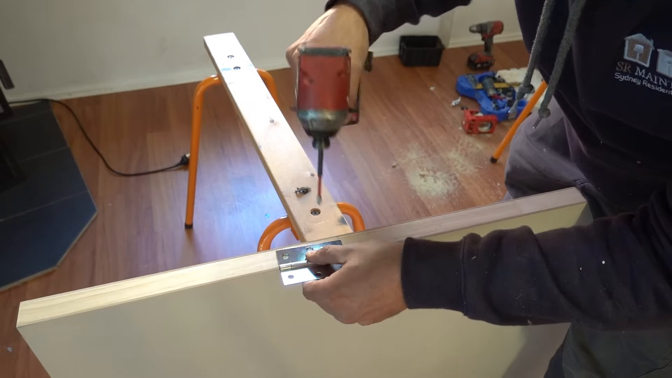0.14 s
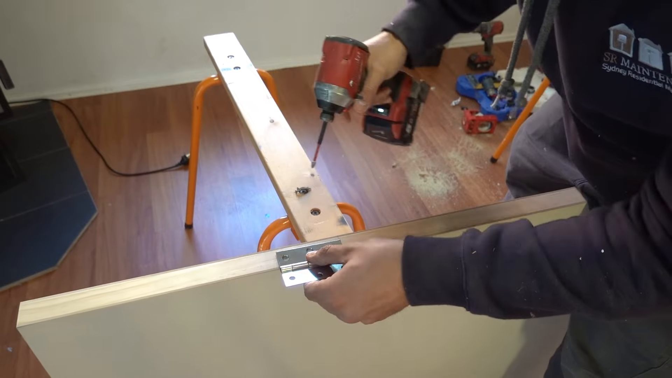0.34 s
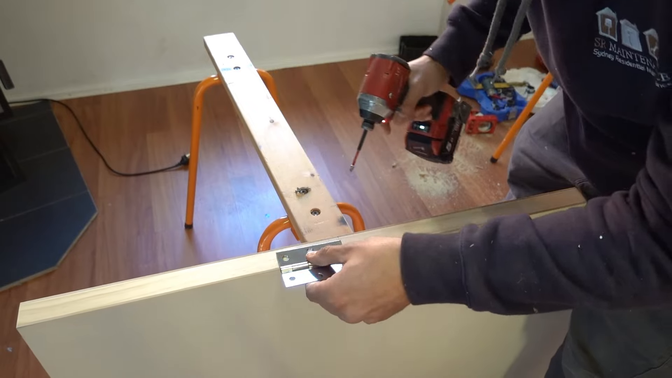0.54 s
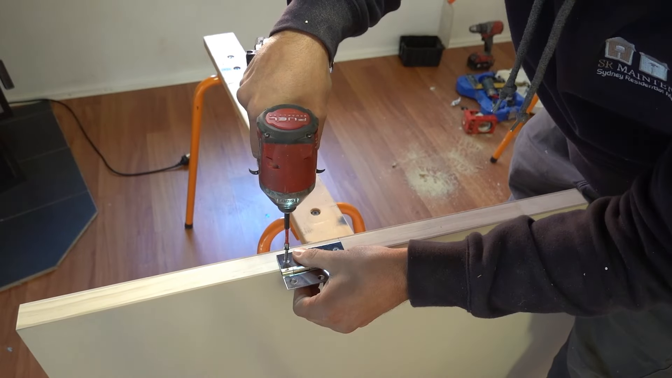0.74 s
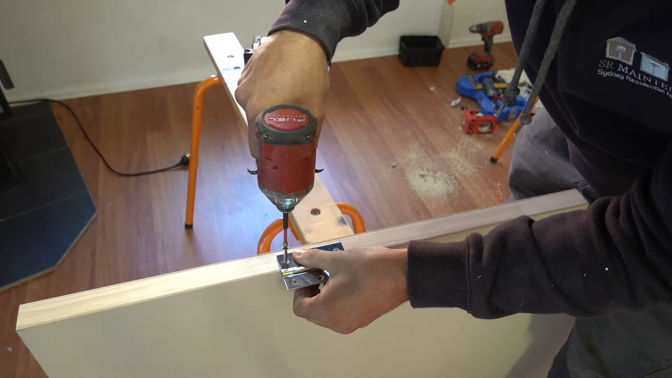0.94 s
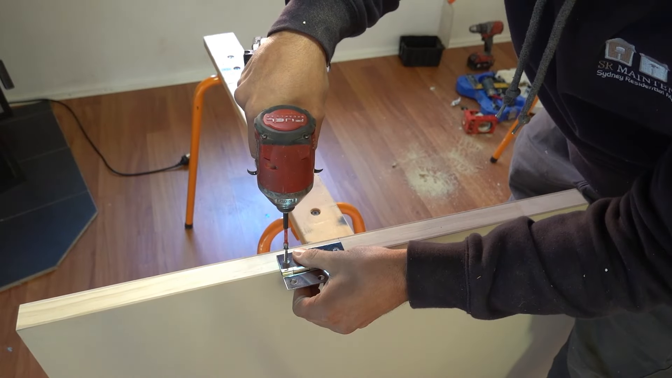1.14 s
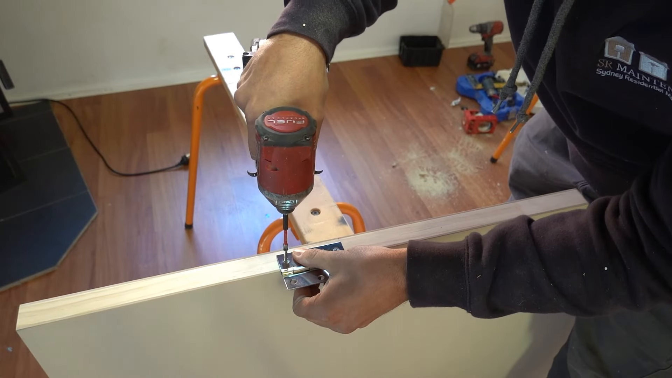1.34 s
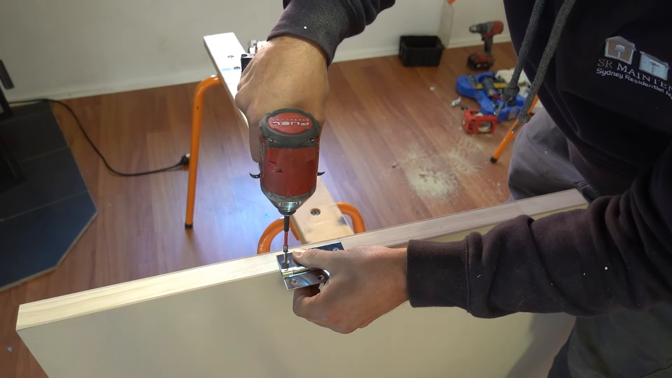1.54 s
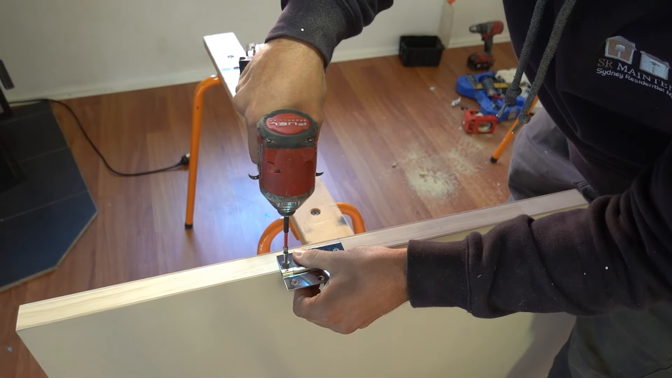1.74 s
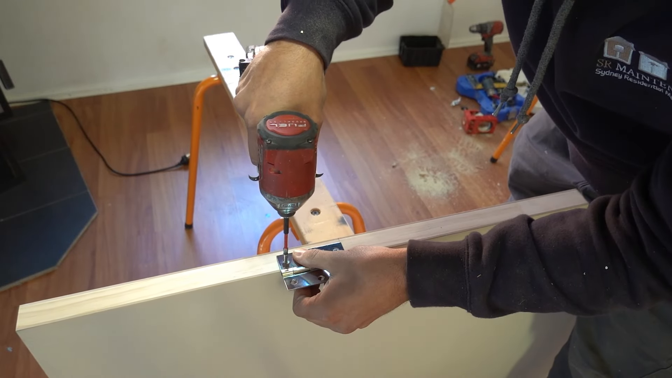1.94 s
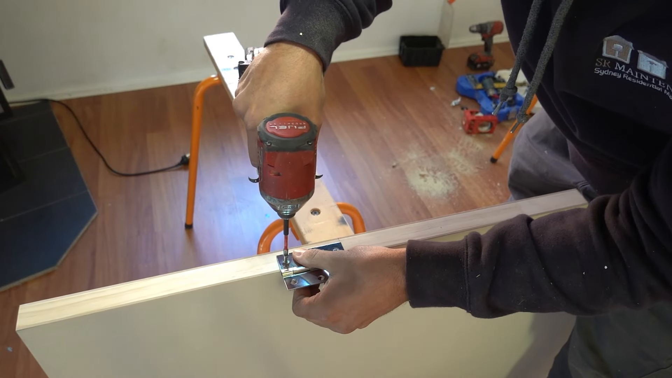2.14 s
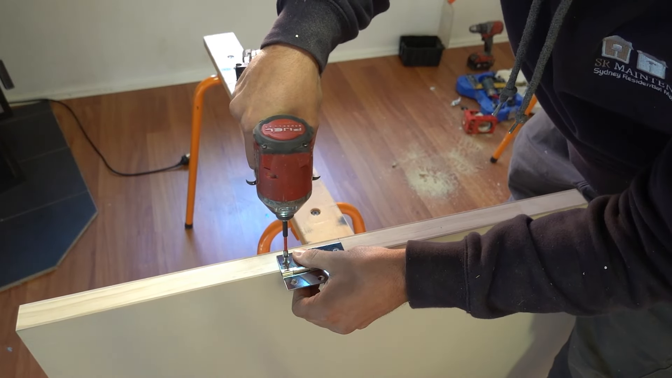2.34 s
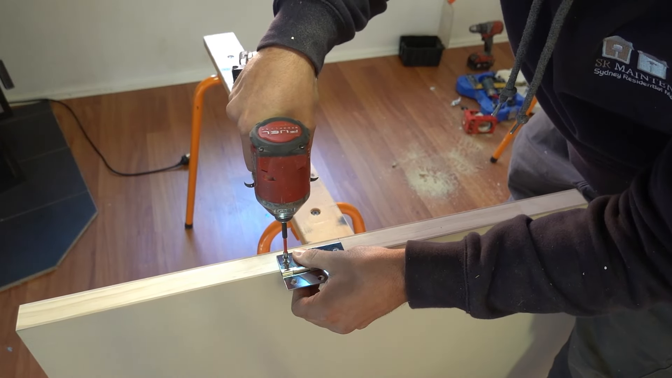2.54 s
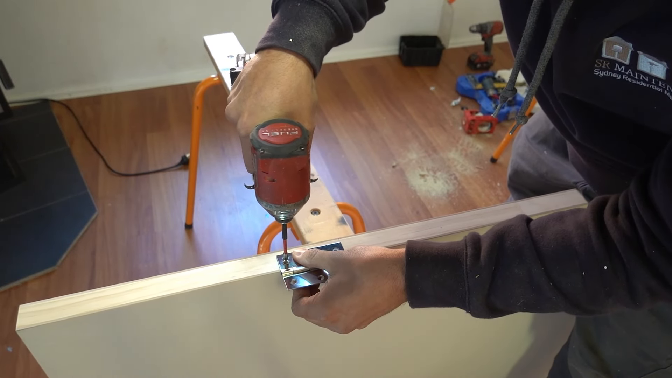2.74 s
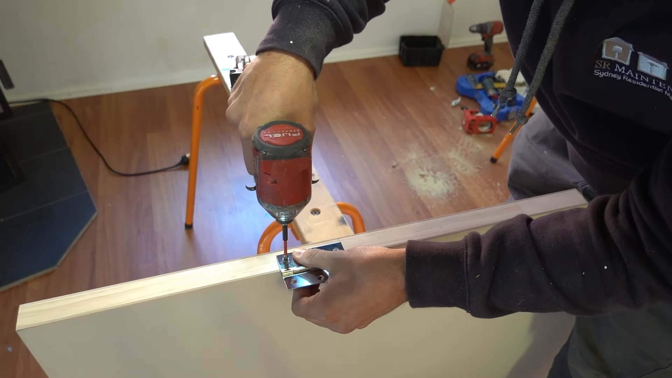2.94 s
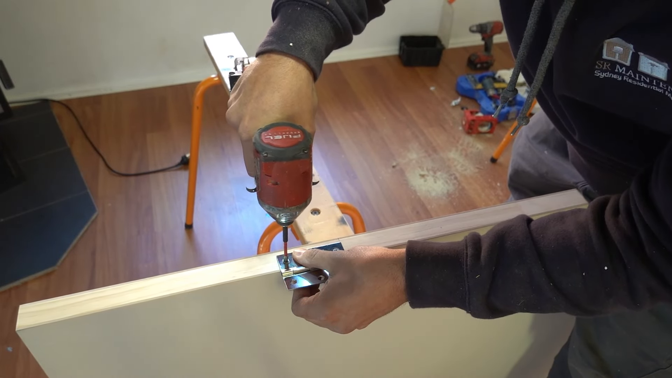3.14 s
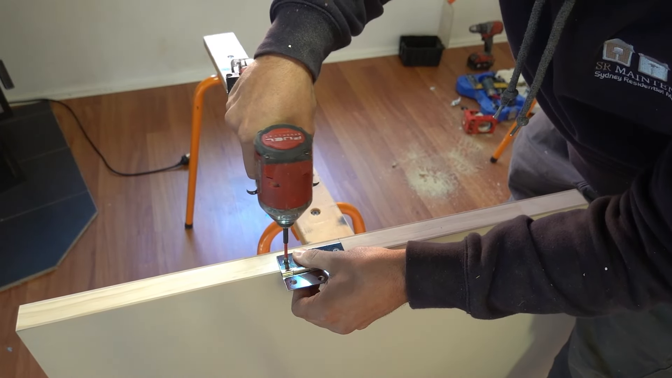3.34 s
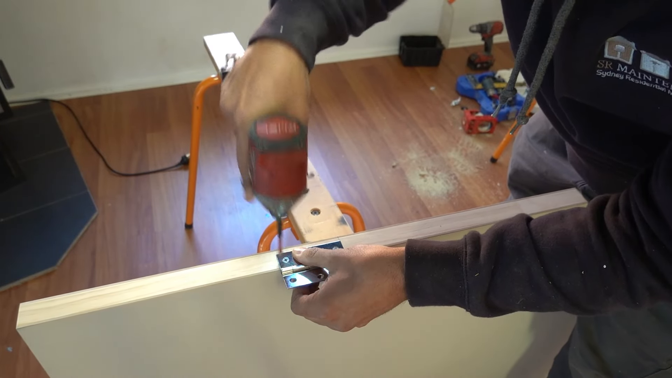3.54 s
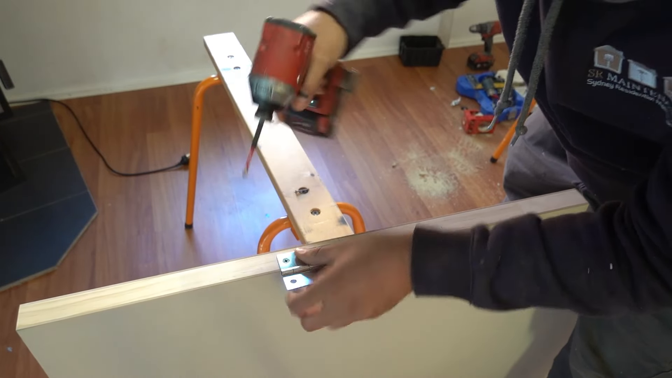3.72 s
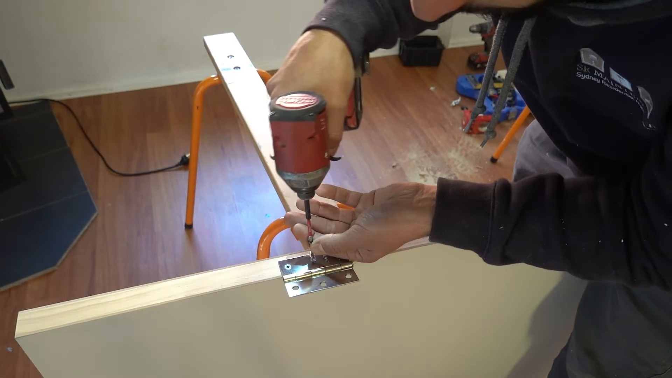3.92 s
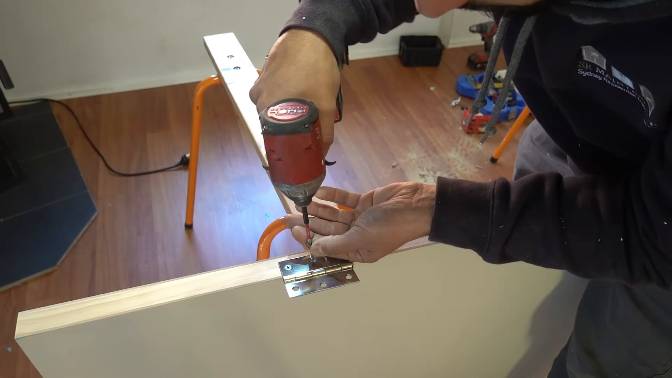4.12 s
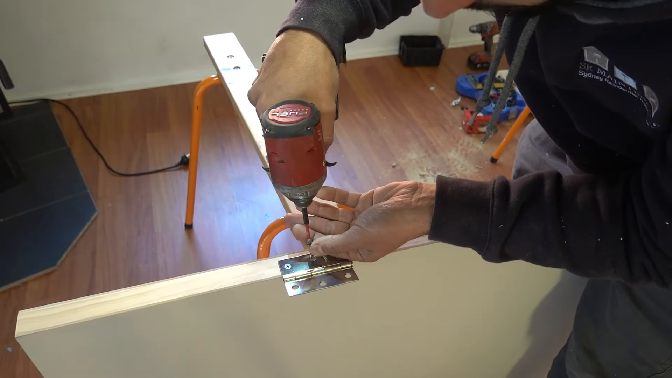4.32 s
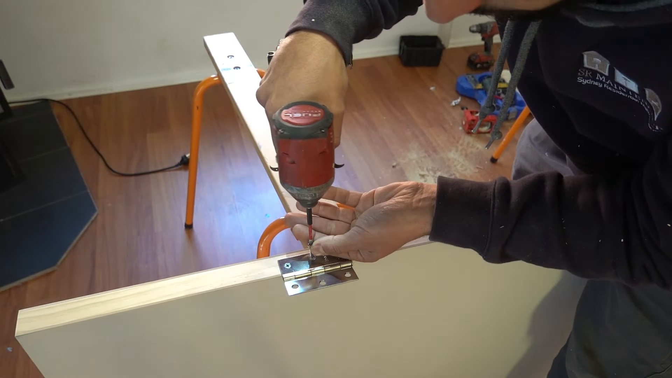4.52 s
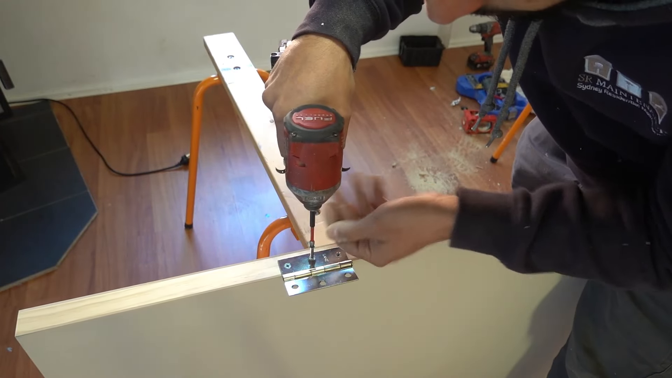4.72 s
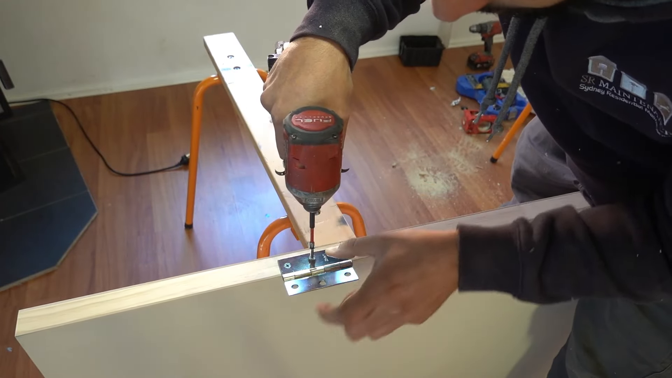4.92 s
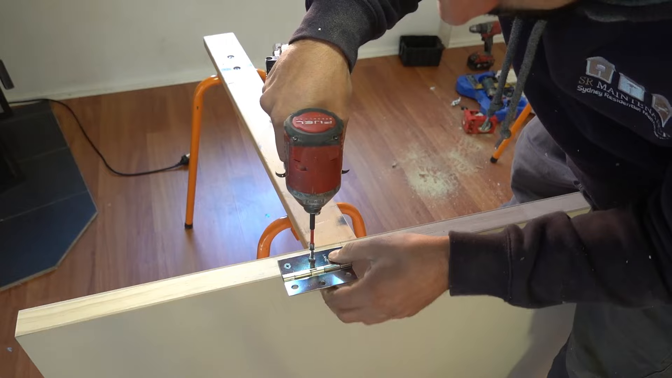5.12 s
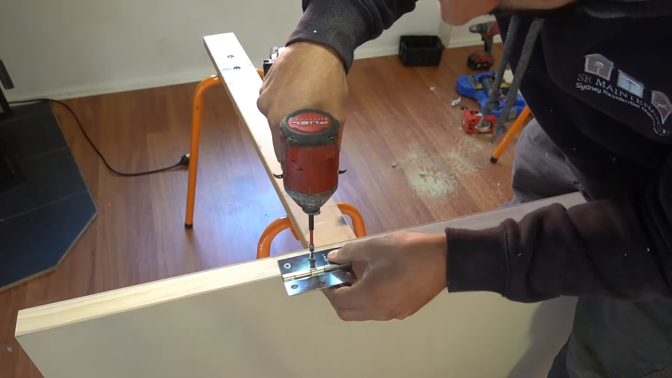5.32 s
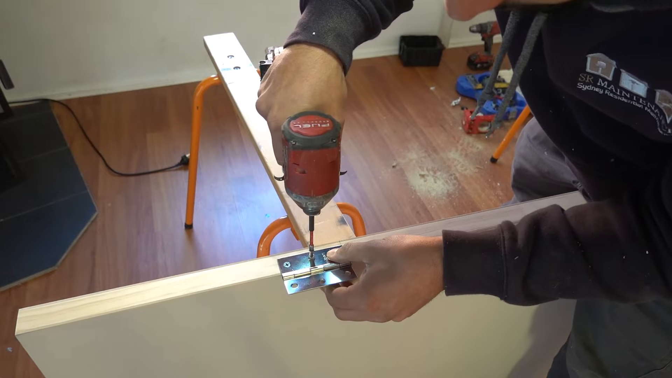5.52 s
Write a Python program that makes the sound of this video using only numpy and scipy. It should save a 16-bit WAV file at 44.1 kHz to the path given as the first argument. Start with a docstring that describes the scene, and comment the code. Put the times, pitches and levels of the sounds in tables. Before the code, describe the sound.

A cordless impact driver winds down with a thump and a few clicks. It creeps back to life, then whirs steadily for nearly three seconds, with rattling gears and a thin high whine, as it drives a screw into a door hinge. It stops with sharp clicks and a thud from the door. The bit taps a screw and a faster run follows. The sound is close, in a bare, echoing workshop.

```python
"""A cordless impact driver runs screws into a door hinge, close up in a bare workshop.
Gear teeth knock in the housing once per mesh, over a rotor hum and a fizz of bearings, fan and thread.
The motor drive switches near 8 kHz, with a tone either side that parts with speed. Trigger, chuck
and bit click, the bit rings, and jolts thump the door. The room echoes over a low rush of air;
the echo cuts off once, just before the last run."""
import sys
import numpy as np
from scipy import signal
from scipy.fft import rfft, irfft, next_fast_len
from scipy.io import wavfile
from scipy.ndimage import uniform_filter1d, minimum_filter1d, map_coordinates

SR = 44100
rng = np.random.default_rng(int(sys.argv[2]) if len(sys.argv) > 2 else 0)


def transcribe(signal):
    """Save signal, clipped to [-1, 1], as a 16-bit WAV file at the path in sys.argv[1]."""
    frames = np.atleast_2d(signal).T
    limited = np.clip(frames, -1, 1)
    pcm = np.round(limited * 32767).astype(np.int16)
    wavfile.write(sys.argv[1], SR, pcm)


N = 245637
PREROLL_S = .5  # played before time zero, so its echo is already there
M = N + round(PREROLL_S * SR)
TIME = np.arange(M) / SR - PREROLL_S

# One curve per trigger pull: (time [s], motor field rate [Hz], relative gear level [dB])
TRIGGER_PULLS = [
    [(-.4, 169.6, -17), (-.1, 140, -19.5), (0, 50, -20)],
    [(.672, 40, -33), (.89, 32.5, -37), (.909, 83.8, -27), (.969, 175, -23), (1.048, 198.7, -17.5),
     (1.15, 189.1, -18), (1.39, 149.5, -17.5), (1.6, 142.3, -17.5), (1.85, 147, -14.5), (1.93, 212, -17),
     (1.97, 219, -13.5), (2.29, 199.5, -15.5), (2.65, 193, -15), (3.13, 180.3, -16), (3.36, 165.6, -16),
     (3.44, 132.7, -16.5), (3.535, 49.87, -19.5)],
    [(4.251, 24.73, -17.5), (4.28, 197.3, -21.5), (4.37, 287, -18.5), (4.45, 318.5, -16), (4.5, 312.2, -16),
     (4.67, 249.8, -16), (4.85, 210.8, -16.5), (5.03, 195.3, -16.5), (5.3, 164.3, -15.5), (5.48, 175, -17),
     (5.52, 230.6, -13.5), (5.56, 252.9, -15)],
]
# Single teeth as the motor creeps or bites: (time [s], relative level [dB])
CREEP_KNOCKS = [(0.6802, -25), (0.714, -31), (0.7447, -23.5), (0.7615, -22.5), (0.78, -24), (0.799, -24),
                (0.816, -22.5), (0.837, -21.5), (0.8562, -25), (0.879, -17), (0.897, -16), (0.9066, -16.5),
                (4.254, -25), (4.2652, -16), (4.278, -16), (4.29, -17)]
# Colour of a knock on the housing: (frequency [Hz], relative level [dB])
HOUSING_EQ = [(220, -69), (380, -33), (431, -12.5), (544, -18.5), (760, -22.5), (873, -20), (979, -21),
              (1040, -15.5), (1150, -7.5), (1500, -0.5), (1790, -5.5), (2250, -14.5), (2970, -12.5),
              (4870, -27), (6000, -29), (7800, -63.5), (13200, -120)]
# Gear case resonances: (frequency [Hz], width [Hz], gain [dB])
CASE_MODES = [(1173, 29, -5.5), (1237, 49, -14.5), (1380, 45, -7), (1453, 47, -7), (1528, 17, -8),
              (1591, 10, -8), (1674, 87, -11), (1764, 40, -7.5), (1916, 59, -13), (2090, 40, -7.5),
              (2676, 370, -14.5), (3006, 202, -4.5), (3370, 102, -7.5), (3660, 31, -25.5)]
# Rotor hum partials: (multiple of field rate, relative level [dB])
ROTOR_ORDERS = [(1.07, -33), (1.5, -27), (3.03, -30)]
# Power flows to the motor: (on [s], off [s])
POWER_SPANS = [(-.4, -.15), (.672, 3.51), (4.247, 5.6)]
# Colour of bearings, fan and thread: (frequency [Hz], relative level [dB])
FIZZ_EQ = [(2060, -36.5), (3500, -5), (5050, -15.5), (7300, -15), (7920, -16.5), (10000, -14.5),
           (11200, -24), (13900, -29), (15900, -35.5)]
# Stereo image of the fizz: (frequency [Hz], left-right likeness)
FIZZ_IMAGE = [(3000, 0.14), (8000, 0.68), (15000, .25)]
# Trigger, chuck and bit: (time [s], tick gain [dB], housing re tick [dB], bit ring re tick [dB])
CLICK_CUES = [(.0744, -36, -6, -30), (.0837, -31, -6, -25), (.1012, -22, -12, -22), (.118, -40, -5, -13),
              (.3247, -50, -6, -35), (.6724, -40, -6, -45), (3.5344, -16, 2, -50), (3.5514, -21, 4, -50),
              (3.6102, -25, 0, -20), (3.6346, -21, -5, -24), (3.652, -38, -5, -4), (3.8404, -49, -6, -35),
              (4.1535, -43, -10, -45), (4.177, -20, -20, -48), (4.2542, -21, -2, -50),
              (4.2584, -24, -6, -50), (4.2685, -16, -8, -50), (4.334, -25, -6, -50)]
# Colour of a click's bright tick: (frequency [Hz], relative level [dB])
TICK_EQ = [(1500, -26), (2500, -9), (4000, -22), (6000, 0), (8000, 0), (10000, -5), (12000, -11),
           (16000, -9)]
# Ring of the bit: (frequency [Hz], relative level [dB], t60 [s])
BIT_MODES = [(7830, -8, .28), (10710, -12, .24), (14610, 4, .3), (15300, -3, .07)]
# The bit meets the screw head: (time [s], relative level [dB])
TAP_CUES = [(4.1533, -35), (4.177, -34.5)]
# Ring of the screw: (frequency [Hz], relative level [dB], t60 [s])
SCREW_MODES = [(1650, -1.5, 0.015), (2160, -4, 0.018), (2710, 6, 0.0123), (3370, -6, .01),
               (5900, -12, 0.013)]
# The tool jolts the door: (time [s], relative level [dB])
THUMP_CUES = [(-.01, -18), (0.011, -28), (0.048, -29.5), (0.091, -51), (1.041, -33.5), (3.547, -16.5),
              (3.563, -20.5), (3.588, -27.5), (3.607, -21.5), (3.622, -26)]
# Door panel resonances: (frequency [Hz], relative level [dB], t60 [s])
DOOR_MODES = [(72, -15, .4), (148, -11, .25), (178, -6, .2), (213, 0, .35), (258, -8, .2), (315, -8, .18),
              (348, -6, .25), (450, -12, .1)]
# Colour of a jolt's rattle: (frequency [Hz], relative level [dB])
RATTLE_EQ = [(200, -31), (400, -2), (600, -4), (950, 3), (1300, -4), (3000, -22.5)]
# Envelope of the scrape: (time [s], relative level [dB])
SCRAPE_ENVELOPE = [(4.156, -64), (4.178, -62), (4.185, -34), (4.2, -43), (4.23, -48), (4.255, -40)]
# Colour of the scrape: (frequency [Hz], relative level [dB])
SCRAPE_EQ = [(590, -60), (1000, -43), (2770, -16), (2870, -8), (3210, -18), (3480, -3.5), (4830, 2),
             (15000, -30.5)]
# Reverb time of the workshop: (frequency [Hz], t60 [s])
ROOM_DECAY = [(60, 0.12), (160, 0.77), (420, 1.05), (1250, 1), (1580, 1.19), (1900, 1.3), (2900, 1.06),
              (7700, 0.98), (15000, 0.13)]
# Stereo image of echo and air: (frequency [Hz], left-right likeness)
ROOM_IMAGE = [(60, 0.96), (150, 1.0), (380, 0.99), (950, 0.85), (2380, 0.89), (5980, -0.31), (15000, 0.37)]
# Colour of the room's air: (frequency [Hz], relative level [dB])
AIR_EQ = [(15, -48.5), (25, -21), (70, -1), (200, -12), (430, -12), (770, -23.5), (2700, -30), (5100, -35),
          (12000, -42.5), (16000, -39.5)]
# Faint steady room whistles: (frequency [Hz], rms level [dB])
ROOM_WHISTLES = [(9932, -92), (13835, -84)]


def gears(field_hz, gain, jitter, wander, scatter_db, grind, chatter_db):
    """One uneven knock per tooth, with grinding between; the case rings and the door drones along."""
    mesh_hz = 1.535 * field_hz  # teeth met per field turn
    teeth = np.flatnonzero(np.diff(np.floor(np.cumsum(mesh_hz) / SR)))
    teeth = teeth[field_hz[teeth] > 80]  # slower teeth come from CREEP_KNOCKS
    period = SR / mesh_hz[teeth]
    timing, strength = rng.standard_normal((len(teeth), 2)).T
    late = jitter * timing + wander * wobble(45)[teeth]  # play in the gears, in tooth periods
    hits = np.clip(teeth + late * period, 0, M - 1).astype(int)
    blows = np.bincount(hits, np.sqrt(period) * amp(scatter_db * strength), M)  # equal power at any speed
    blows = signal.lfilter(*signal.butter(2, 850, "high", fs=SR), blows)  # hard teeth give little bass
    noise = rng.standard_normal(M)
    load = gain * amp(chatter_db * wobble(65))  # the bit catches and slips in the screw head
    force = load * (np.sqrt(1 - grind) * blows + np.sqrt(grind) * noise)
    for s, db in CREEP_KNOCKS:
        add(force, s, amp([db + 11.5]))
    knocks = signal.fftconvolve(force, pulse(HOUSING_EQ))[:M]
    case = lambda f: 0.59 + sum(amp(db) * 1j * f * width / (hz * hz - f * f + 1j * f * width)
                                for hz, width, db in CASE_MODES)
    panel = lambda f: sum(amp(db) * np.exp(-((f - hz) * t60 / 4.6) ** 2) for hz, db, t60 in DOOR_MODES)
    return filtered(knocks, case) + amp(-1) * filtered(gain * noise, panel)


def trigger():
    """The pulls set field rate, gear gain and drive power, all zero between runs."""
    field_hz, gain = np.zeros((2, M))
    for pull in TRIGGER_PULLS:
        s, hz, db = np.transpose(pull)
        running = (TIME >= s[0]) & (TIME < s[-1] + .01)
        field_hz[running] = np.interp(TIME[running], s, hz)
        gain[running] = amp(np.interp(TIME[running], s, db))
    power = sum((TIME >= on) & (TIME < off) for on, off in POWER_SPANS)
    return field_hz, gain, uniform_filter1d(power * 1., size=88)


def rotor_hum(field_hz, gain):
    """Low rotor orders hum unsteadily and thin out at high speed."""
    turn = 2 * np.pi * np.cumsum(field_hz) / SR
    hum = sum(amp(db + 4 * wobble(16)) * np.sin(order * turn + 1.4 * wobble(28))
              for order, db in ROTOR_ORDERS)
    return amp(-0.5) * gain * hum * np.clip(2.6 - field_hz / 130, 0, 1)


def drive_whine(field_hz, power, switch_hz=7990, crawl_hz=70):
    """The switching tone splits by the field rate; a trace of the unsplit tone stays."""
    turn = 2 * np.pi * np.cumsum(field_hz) / SR
    switch = 2 * np.pi * switch_hz * TIME
    creep = np.clip(2 - 2 * field_hz / crawl_hz, 0, 1)  # 1 at a crawl, 0 at speed
    lower = amp(-34.5 - 3.5 * creep + 1.2 * wobble(12))
    upper = amp(-41 + 2.5 * creep + (1 - creep) * 2.5 * wobble(11))
    tones = lower * np.sin(switch - turn) + upper * np.sin(switch + turn)
    tones += amp(-21) * lower * np.sin(switch)
    tones += amp(-16) * lower * (np.sin(switch - 2 * turn) + np.sin(switch - 4 * turn))
    tones += creep * amp(-64) * np.sin(1.5 * switch + 2.5 * wobble(300))  # faint fuzzy overtone
    return np.sqrt(2) * amp(1.4 * wobble(25)) * tones * power


def fizz(field_hz, gain, knee_hz=190, db_per_octave=4.5):
    """Bearings, fan and thread hiss, louder at high speed, flaring as the thread cuts."""
    level = gain * amp(-17 + db_per_octave * np.log2(np.maximum(field_hz / knee_hz, 1)))
    hiss = coloured(stereo_noise(M, FIZZ_IMAGE), FIZZ_EQ)
    flares_db = 1.1 * wobble(9) + 2.3 * wobble(110)
    return level * amp(flares_db) * hiss


def clicks():
    """Each click cracks in the treble, knocks the housing and rings the bit."""
    track = np.zeros(M)
    for s, db, body_db, ring_db in CLICK_CUES:
        add(track, s, amp(db) * burst(TICK_EQ, t60=.003))
        add(track, s, amp(db + body_db) * burst(HOUSING_EQ, t60=.006))
        add(track, s, amp(db + ring_db) * ringing(BIT_MODES, attack_s=.003, blur=22))
    return track


def screw_taps():
    """The bit lands on the screw head with a short clink."""
    track = np.zeros(M)
    for s, db in TAP_CUES:
        add(track, s, amp(db) * ringing(SCREW_MODES, attack_s=.00062, blur=20))
    return track


def door_thumps():
    """Each jolt of the tool booms and rattles the door."""
    track = np.zeros(M)
    for s, db in THUMP_CUES:
        add(track, s, amp(db) * ringing(DOOR_MODES, attack_s=.0083, blur=7.7))
        add(track, s, amp(db - 6) * burst(RATTLE_EQ, t60=.11))
    return track


def scrape():
    """A short, grainy hiss leads into the last run."""
    s, db = np.transpose(SCRAPE_ENVELOPE)
    hiss = coloured(rng.standard_normal(M), SCRAPE_EQ)
    return amp(np.interp(TIME, s, db, -120, -120) + 2 * wobble(120)) * hiss


def workshop_echo(send, cut_s=3.955):
    """Each frequency dies at its own speed; the tail of all that sounds before cut_s stops there."""
    hz, t, spectra = signal.stft(stereo_noise(SR, ROOM_IMAGE), SR, nperseg=256)
    decay = amp(-60 * t / along(ROOM_DECAY, hz)[:, None])
    tail = signal.istft(spectra * decay, SR, nperseg=256)[1]
    tail = np.pad(tail / np.linalg.norm(tail[0]), ((0, 0), (200, 0)))  # pre-delay
    before = np.clip((cut_s - TIME) / .004, 0, 1)
    echo = lambda part: signal.fftconvolve(part[None], tail, axes=1)[:, :M]
    return before * echo(send * before) + echo(send * (1 - before))


def room_tone():
    """A low bed of air with two thin whistles."""
    air = amp(-56) * coloured(stereo_noise(M, ROOM_IMAGE), AIR_EQ)
    return air + sum(np.sqrt(2) * amp(db) * np.sin(2 * np.pi * hz * TIME) for hz, db in ROOM_WHISTLES)


def amp(db):
    """Decibels to gain."""
    return 10 ** (np.asarray(db) / 20)


def along(points, hz):
    """Reads a curve on a log frequency axis."""
    knots_hz, values = np.transpose(points)
    return np.interp(np.log(hz + 1), np.log(knots_hz + 1), values)


def wobble(rate):
    """A smooth random curve, rate knots a second."""
    return map_coordinates(rng.standard_normal(int(M * rate / SR) + 4), [np.arange(M) * rate / SR])


def filtered(x, response):
    """Filters x by a function of frequency."""
    size = next_fast_len(x.shape[-1] + 8192)
    return irfft(rfft(x, size) * response(np.fft.rfftfreq(size, 1 / SR)), size)[..., :x.shape[-1]]


def coloured(noise, eq):
    """Noise through an EQ curve, at unit rms."""
    shaped = filtered(noise, lambda hz: amp(along(eq, hz)))
    return shaped / np.sqrt(np.mean(shaped ** 2) + 1e-20)


def stereo_noise(length, image):
    """Left and right white noise, as alike as the image curve says."""
    angle = lambda hz: np.arccos(np.clip(along(image, hz), -1, 1)) / 2
    weights = lambda hz: np.array([np.cos(angle(hz)), np.sin(angle(hz))])
    mid, side = filtered(rng.standard_normal((2, length)), weights)
    return np.array([mid + side, mid - side])


def pulse(eq):
    """A minimum-phase knock of unit energy, coloured by eq."""
    cepstrum = irfft(np.log(amp(along(eq, np.fft.rfftfreq(4096, 1 / SR))) + 1e-4))
    cepstrum[1:2048] *= 2
    cepstrum[2049:] = 0
    knock = irfft(np.exp(rfft(cepstrum)))[:2048]
    return knock / np.linalg.norm(knock)


def burst(eq, t60):
    """A dying puff of coloured noise."""
    t = np.arange(SR // 4) / SR
    return signal.fftconvolve(amp(-60 * t / t60) * rng.standard_normal(len(t)), pulse(eq))


def ringing(modes, attack_s, blur):
    """One blow on a set of modes, each at a new strength; drifting phase blurs the tones."""
    t = np.arange(SR // 2) / SR
    drift = lambda: blur * np.cumsum(rng.standard_normal(len(t))) / np.sqrt(SR)
    ring = sum(amp(db + rng.normal(0, 0.82) - 60 * t / t60) * np.sin(2 * np.pi * hz * t + drift())
               for hz, db, t60 in modes)
    return ring * (1 - np.exp(-t / attack_s))


def add(track, s, sound):
    """Mixes a sound in from time s."""
    part = track[round((s + PREROLL_S) * SR):][:len(sound)]
    part += sound[:len(part)]


def scene():
    """Tool and door up front, the room behind; the whine beams forward and stirs the room less."""
    field_hz, gain, power = trigger()
    tool = gears(field_hz, gain, jitter=.018, wander=.033, scatter_db=2.5, grind=.17, chatter_db=2.8)
    tool += rotor_hum(field_hz, gain) + clicks() + screw_taps() + door_thumps() + scrape()
    hiss = fizz(field_hz, gain * np.maximum(power, .4))  # ducks while the motor coasts
    whine = drive_whine(field_hz, power)
    direct = amp(-2) * (tool + whine) * amp([[.15], [-.15]]) + hiss
    echo = amp(-4) * workshop_echo(tool + hiss[0] + .5 * whine)
    return (direct + echo + room_tone())[:, -N:]


def record(dry, ceiling=.66, top_hz=15900):
    """A fast limiter holds the peaks down; a brick-wall low-pass trims the top."""
    needed = np.minimum(1, ceiling / (np.abs(dry).max(0) + 1e-9))
    gain = uniform_filter1d(minimum_filter1d(needed, size=265), size=133)
    return filtered(dry * gain, lambda hz: hz < top_hz)


dry = scene()
out = record(dry)
transcribe(out)
```